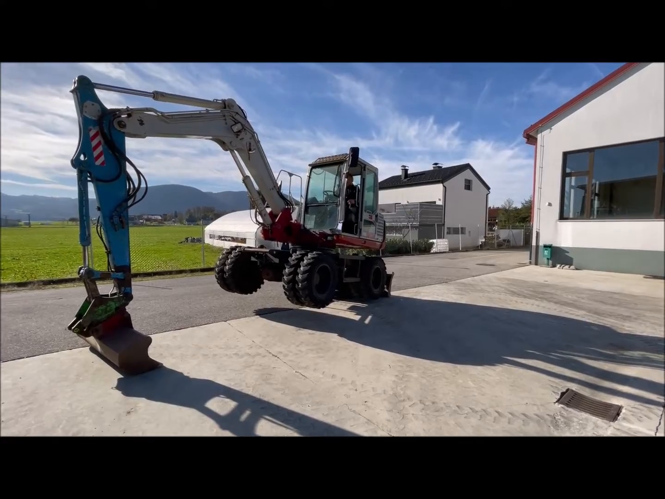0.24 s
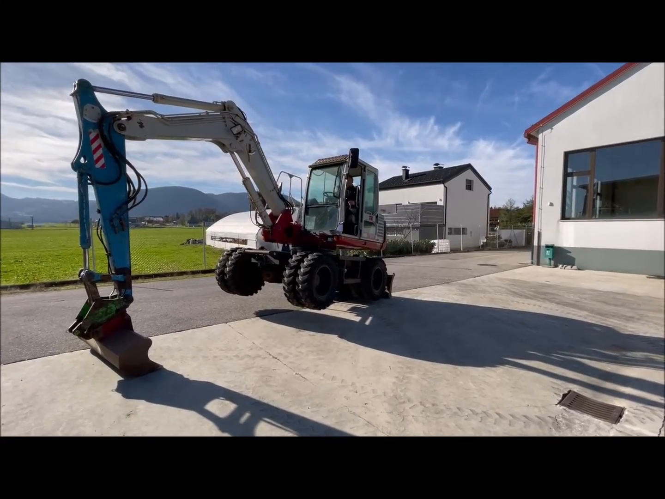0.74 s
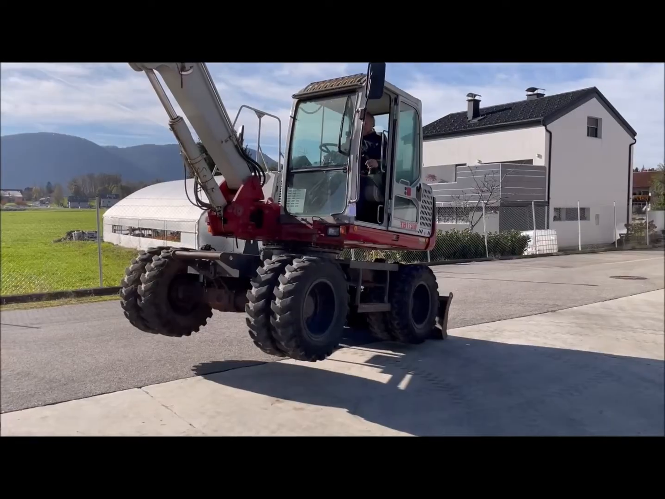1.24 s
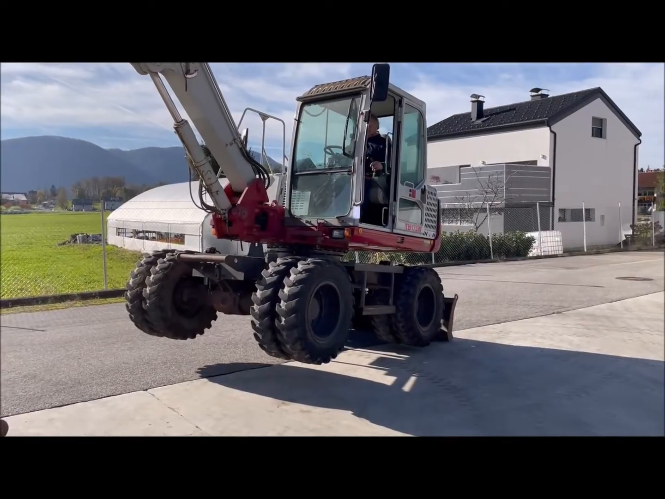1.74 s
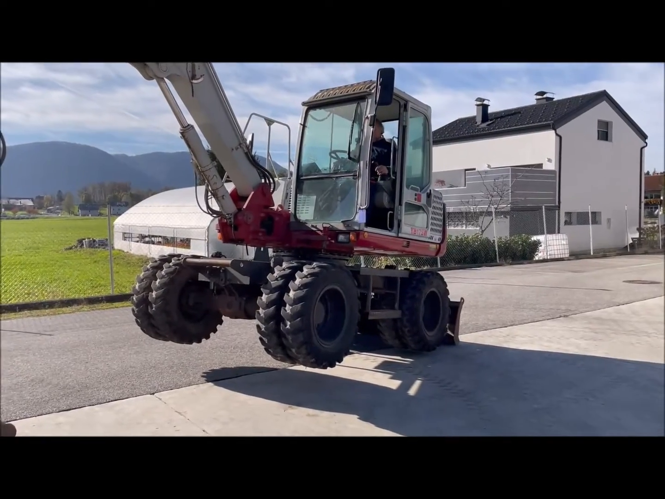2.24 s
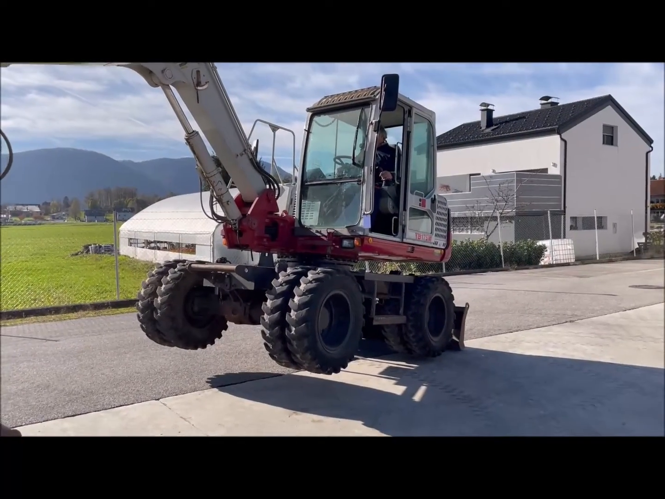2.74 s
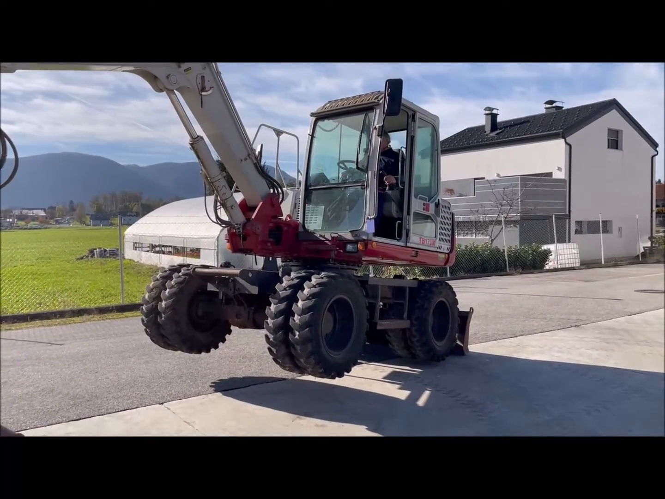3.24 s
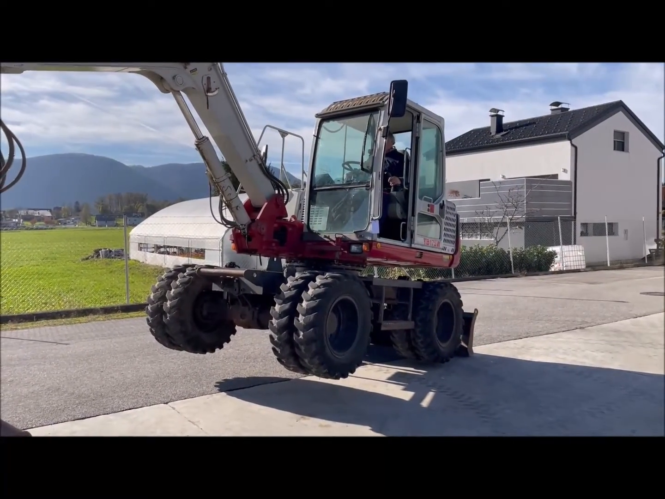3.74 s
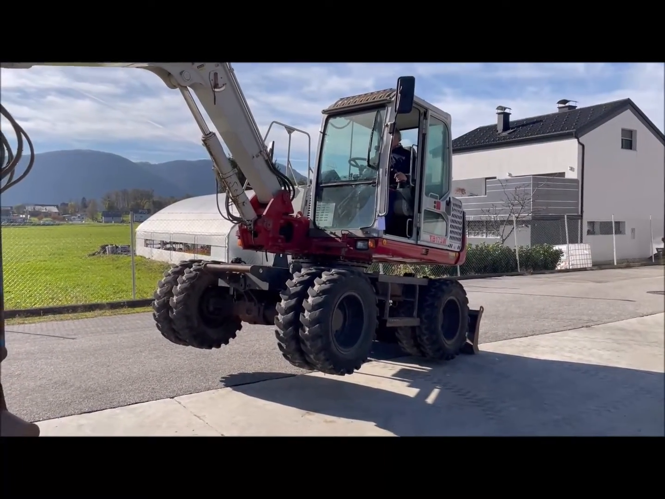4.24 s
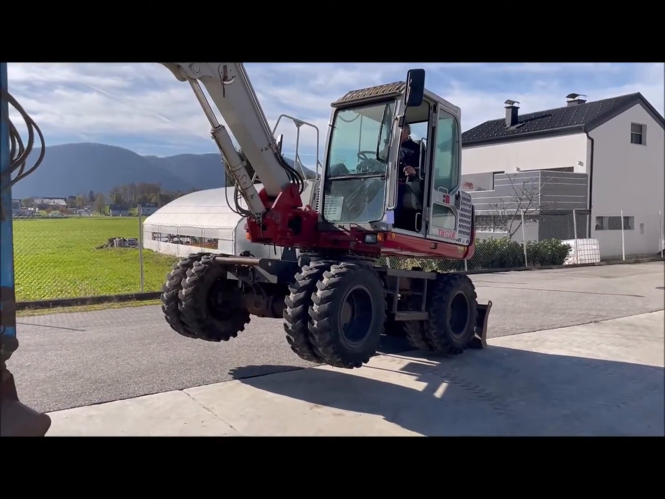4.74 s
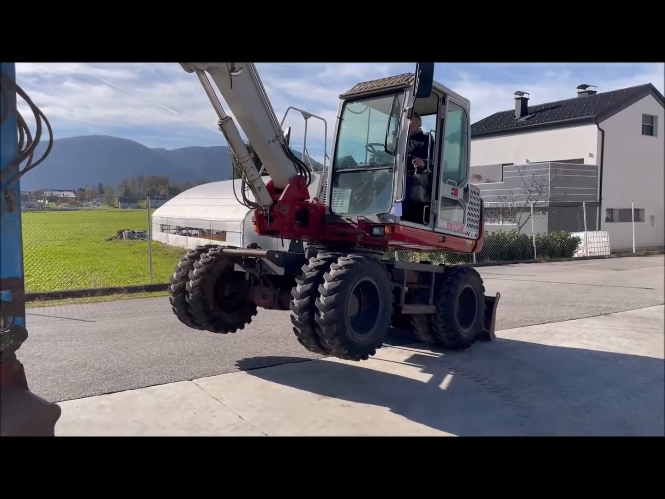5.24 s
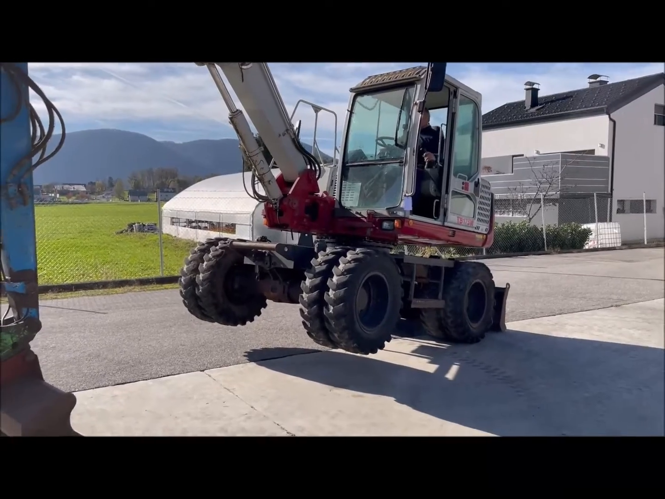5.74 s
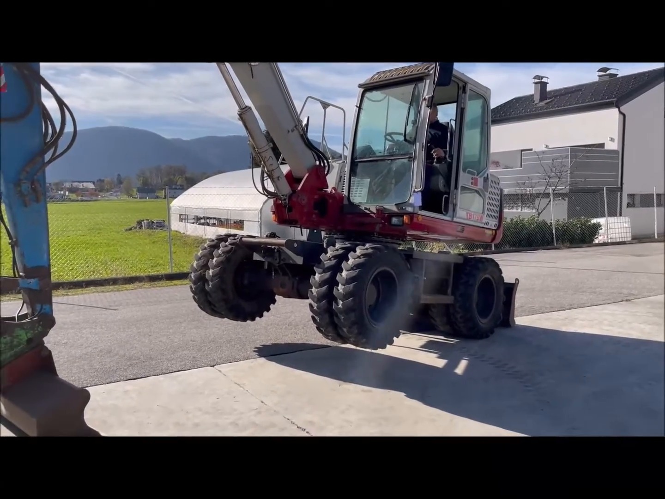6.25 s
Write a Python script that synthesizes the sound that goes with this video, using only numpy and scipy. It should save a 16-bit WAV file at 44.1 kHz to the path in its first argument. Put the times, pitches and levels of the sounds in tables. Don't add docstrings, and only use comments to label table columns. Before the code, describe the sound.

A mid-distance stereo pickup, narrowing toward the machine after a second, catches a low pulsing diesel with knocking panels and faint pump whine. Low wind buffets come and go. Around two seconds the load releases with moans and light ticks. Steady drone returns until a loud, uneven steel bucket scrape with hollow thuds, gritty rasp, stone cracks and pin clinks dominates the last second.

```python
import sys
import numpy as np
from scipy import signal
from scipy.fft import rfft, irfft
from scipy.io import wavfile

SR = 44100
rng = np.random.default_rng(int(sys.argv[2]) if len(sys.argv) > 2 else 0)


def volts(x):
    e = np.asarray(x, float) / 20
    return 10 ** e


def put_to_file(sound):
    columns = np.atleast_2d(sound).T
    safe = np.clip(columns, -1, 1)
    whole_steps = np.round(safe * 32767)
    wavfile.write(sys.argv[1], SR, whole_steps.astype(np.int16))


N = 286650
TIME = np.arange(N) / SR
HZ = np.maximum(np.fft.rfftfreq(N, 1 / SR), 1)
BLOCK_DB = -31.5


def rms_one(x):
    return x / np.sqrt(np.mean(x ** 2) + 1e-20)


def noise():
    return rng.standard_normal(N)


def in_time(rows):
    t, *columns = np.transpose(rows)
    return [np.interp(TIME, t, column) for column in columns]


def at_hz(points):
    hz, value = np.transpose(points)
    return np.interp(np.log(HZ), np.log(hz), value)


def colour(x, spectrum):
    below = (spectrum[0][0] / 1.5, -90)
    above = (spectrum[-1][0] * 1.2, -90)
    return rms_one(irfft(rfft(x) * volts(at_hz([below] + list(spectrum) + [above])), N))


def drift(rate_hz):
    return rms_one(irfft(rfft(noise()) / (1 + (HZ / rate_hz) ** 2), N))


def ring(x, hz, width_hz):
    radius, angle = np.exp(-np.pi * width_hz / SR), 2 * np.pi * hz / SR
    return signal.lfilter([0, np.sin(angle)], [1, -2 * radius * np.cos(angle), radius ** 2], x + 1e-18)


# (t/s, rate/firings per s)
FIRING_RATE = [(0, 47.35), (.4, 47.3), (.9, 47.05), (1.28, 46.6), (1.6, 46.1), (2.15, 45.95), (2.32, 46.2),
               (2.5, 47), (2.8, 47.35), (3.3, 47.4), (3.9, 47.2), (4.3, 47.35), (5.08, 47.4), (5.22, 46.9),
               (5.35, 46), (5.6, 46), (5.9, 46.6), (6.5, 46.9)]


def crankshaft():
    return np.cumsum(in_time(FIRING_RATE)[0]) / SR + .5


# (multiple of the four-firing cycle, level/dB)
EXHAUST_ORDERS = [(1, -40), (2, -34), (3, -24), (4, -4), (5, -17), (6, -25), (8, 1.5), (9, -26), (10, -14),
                  (11, -22), (12, -9), (13, -25), (14, -20), (16, -12.5), (18, -24), (20, -25.5),
                  (24, -21.5), (28, -25.5), (32, -24.5), (36, -22.5), (38, -29), (40, -23.5)]


def exhaust(firings, level_db):
    out = 0
    for order, db in EXHAUST_ORDERS:
        waver = volts(db + .5 * drift(0.46))
        offset = 2 * np.pi * rng.random() * (order % 4 > 0)
        offset = offset + .5 + 2.6 * np.clip(order / 8 - 1, 0, 1)
        out = out + waver * np.cos(2 * np.pi * order * firings / 4 + offset + .07 * drift(3.0))
    return np.sqrt(2) * volts(level_db) * out


CYLINDER_DB = [-2, 0, -2.5, -1]
# (f/Hz, level/dB per Hz)
BLOCK_SPECTRUM = [(130, 1.5), (185, -7.5), (245, -10), (340, -12.5), (460, -15.5), (610, -8), (780, -13.5),
                  (1280, -14), (1850, -16), (2650, -20.5), (3300, -25), (6500, -34.5), (10000, -39),
                  (15800, -46.5)]
# (f/Hz, power share 0-1)
LOOP_SHARE = [(150, .1), (700, .25), (1200, .5), (2000, .7), (4000, .65), (8000, .4)]
# (f/Hz, share 0-1)
KNOCK_SHARE = [(200, .3), (600, .55), (1500, .4), (2500, .45), (5000, .15), (9000, .05)]
# (f/Hz, width/Hz, rattle level/dB, knock level/dB, hardest firing 0-3, its lead/dB)
PANELS = [(555, 60, -12, -27, 2, 0), (600, 90, -6, -24, 3, 0), (655, 50, -14, -29, 0, 1),
          (915, 45, 0, -13, 1, 6), (1110, 50, -12, -16, 3, 13), (1530, 50, 0, -14, 0, 2),
          (1670, 80, -5, -12, 2, 10), (2030, 80, -10, -17, 3, 9), (2195, 100, -3, -19, 1, 3),
          (2570, 50, -6, -24, 2, 8)]


def block(firings, level_db):
    cycle = round(4 * SR / 47)
    place = (firings + .001 * drift(6.0)) / 4 * cycle
    looped = rng.standard_normal(cycle)[place.astype(int) % cycle]
    recurs = at_hz(LOOP_SHARE)
    clatter = irfft(np.sqrt(recurs) * rfft(looped) + np.sqrt(1 - recurs) * rfft(noise()), N)

    since = (firings + 0.36) % 1
    swell = volts(np.array(CYLINDER_DB)[firings.astype(int) % 4])
    swell = rms_one(swell * (1 - np.exp(-since / .12)) ** 2 * np.exp(-since / .35))
    pulsed = at_hz(KNOCK_SHARE)
    driven = pulsed * rfft(clatter * swell) + (1 - pulsed) * rfft(clatter)

    response, knocks = 1, 0
    for k, (hz, width, rattle_db, knock_db, hardest, lead_db) in enumerate(PANELS):
        response = response + volts(rattle_db) / (1 + 2j * (HZ - hz) / width)
        count = (firings + .12 + .035 * k).astype(int)
        chance_db = 1.2 * rng.standard_normal(count[-1] + 1)[count]
        blow_db = knock_db + lead_db * (count % 4 == round(hardest)) + chance_db
        blows = np.diff(count, prepend=count[0]) * volts(blow_db)
        knocks = knocks + ring(ring(blows, hz, 140), hz, 1.2 * width)
    knock_level_db = -11 + 0.51 * (level_db - BLOCK_DB)
    rattle = colour(irfft(driven * response, N), BLOCK_SPECTRUM)
    return volts(level_db + .5 * drift(0.51)) * (rattle + volts(knock_level_db) * rms_one(knocks))


# (multiple of the four-firing cycle, level/dB)
GEAR_ORDERS = [(42, -52), (44, -51), (46, -43.5), (48, -50), (50, -42.5), (51, -49), (52, -42.5),
               (54, -46.5), (56, -43.5), (58, -52), (60, -54)]


def whines(firings, level_db):
    mesh_at, cover_turn = .87, 4.1
    sway = .1 * drift(5.0)
    gear = 0
    for order, db in GEAR_ORDERS:
        phase = np.pi / 2 * order * (firings - mesh_at) + cover_turn * (order > 51) + sway
        gear = gear + volts(db + .8 * drift(4.0)) * np.cos(phase)
    whistle = volts(-46.5 + 1.5 * drift(7.0)) * np.sin(2 * np.pi * 1528 * TIME + .45 * drift(6.0))
    return np.sqrt(2) * volts(level_db - BLOCK_DB) * (gear + whistle)


# (multiple of the firing rate, level/dB)
PUMP_ORDERS = [(12, -40), (20, -48), (24, -49), (48, -39), (67, -61)]
# (f/Hz, level/dB per Hz)
VALVE_HISS = [(2000, -32), (3500, -29), (5800, -13), (6700, 4), (7400, 6), (9000, -43)]
# (start t/s, hold/s, level/dB)
MOANS = [
    (1.682, 0.28, -33.5),
    (2.059, 0.032, -32.5),
    (2.195, 0.01, -34.5),
]
# (t/s, level/dB, half length/s)
AIR_BLEEDS = [
    (1.81, -55.5, .02),
    (1.932, -51, 0.03),
    (2.05, -52.5, 0.03),
    (2.19, -55, .025),
    (5.31, -51, 0.035),
]
# (f/Hz, level/dB per Hz)
BLEED_HISS = [(9500, -32), (10800, -7), (12000, -6), (14200, 1), (15800, -6)]


def hydraulics(firings, pressure_db):
    whine = 0
    for order, db in PUMP_ORDERS:
        phase = 2 * np.pi * round(order) * firings + .25 * drift(8.0)
        whine = whine + volts(db + 1.5 * drift(10.0)) * np.sin(phase)
    swell, attack, release = 0, 0.031, 0.038
    for t, hold, db in MOANS:
        corners = np.cumsum([t, attack, hold, release]) - attack
        swell = swell + volts(db) * np.interp(TIME, corners, [0, 1, 1, 0])
    moan = swell * np.sin(2 * np.pi * 6 * firings)
    tones = np.sqrt(2) * (volts(np.minimum(pressure_db, 0)) * whine + moan)
    hiss = volts(-54.0 + .5 * pressure_db + 4.2 * drift(9.1)) * colour(noise(), VALVE_HISS)
    bleed = sum(volts(db) * np.exp(-((TIME - t) / half) ** 4) for t, db, half in AIR_BLEEDS)
    return tones + hiss + bleed * colour(noise(), BLEED_HISS)


# (crest t/s, level/dB)
GUSTS = [(0.005, -27.5), (.39, -28), (.49, -29), (.74, -33), (1.165, -25), (1.26, -24.5), (2.13, -60),
         (2.36, -48), (2.9, -27.5), (3.055, -28.5), (3.15, -34), (3.3, -30), (3.41, -27), (3.54, -38),
         (3.74, -44), (4.22, -27.5), (4.38, -25), (4.63, -35), (4.8, -25.5), (4.88, -28.5), (5.2, -36),
         (5.34, -28.5), (5.8, -42), (5.98, -50)]
# (f/Hz, level/dB per Hz)
WIND_RUMBLE = [(15, -54), (25, 1), (60, 14), (91, 14.5), (244, -16), (284, -12.5), (361, -18.5),
               (708, -9.5), (900, -25.5), (1170, -58), (1980, -120)]


def wind():
    gust_db = np.full(N, -55.0)
    for t, db in GUSTS:
        fall_db = np.maximum(217 * (t - TIME), 115 * (TIME - t))
        gust_db = np.maximum(gust_db, db - fall_db)
    shared = 0.42 * noise()
    return np.array([volts(gust_db + 6.0 + 1.7 * drift(33.0)) * colour(shared + noise(), WIND_RUMBLE)
                     for _ in range(2)])


def struck(blows, modes, snap, nearest_db):
    t, peak_db, nearest = np.transpose(blows)
    chance = rng.standard_normal((len(t), len(modes)))
    tick = sum(volts(db - 21) * (TIME > at) * np.exp(-np.abs(TIME - at) / 0.005) for at, db in zip(t, peak_db))
    out = tick * colour(noise(), snap)
    for k, (hz, db, t60) in enumerate(modes):
        clicks = np.zeros(N)
        strength_db = peak_db + db - 24 + nearest_db * (nearest.round() == k) + 1.1 * chance[:, k]
        clicks[(t * SR).astype(int)] = volts(strength_db)
        out = out + ring(clicks, hz, np.log(1000) / np.pi / t60)
    return out


# (t/s, peak level/dB, mode nearest the blow 0-5)
CLAMP_TICKS = [
    (2.1357, -25, 1),
    (2.2615, -24, 3),
    (2.2944, -21, 2),
    (2.3143, -19, 5),
    (2.356, -29, 2),
    (2.372, -27, 5),
    (2.3862, -23, 2),
    (2.4725, -29, 0),
    (2.4964, -21, 3),
]
# (f/Hz, level/dB, t60/s)
CLAMP_MODES = [(3150, -2, .02), (3700, -2, .018), (3950, -4, .035), (4830, -2, .022), (6000, -3, .015),
               (6700, -7, .03)]
# (f/Hz, level/dB per Hz)
CLAMP_SNAP = [(2800, -12), (3500, 13), (6300, -3), (7200, -7)]


def hose_clamps():
    return volts(8.0) * struck(CLAMP_TICKS, CLAMP_MODES, CLAMP_SNAP, nearest_db=8.0)


def chatter(low_hz, high_hz, per_s, cycles):
    height = volts(3.2 * np.minimum(rng.exponential(1, N), 4)) * rng.choice([-1, 1], N)
    hits = (rng.random(N) < per_s / SR) * height
    dealt = rng.integers(0, 14, N)
    patches = np.geomspace(low_hz, high_hz, 14)
    grains = sum(ring(hits * (dealt == k), hz, hz / cycles) * hz ** .5 for k, hz in enumerate(patches))
    return rms_one(grains) + 0.44 * noise() * np.sqrt(SR / 2 / (high_hz - low_hz))


# (f/Hz, width/Hz, level/dB)
SHELL_MODES = [(320, 74, 0.5), (490, 100, -3.5), (630, 75, 0.5), (800, 115, -1.5), (1050, 100, 0),
               (1300, 120, -6.5)]


def judder():
    steps = (np.cumsum(110 * volts(4 * drift(29.93))) / SR).astype(int)
    kicks = np.diff(steps, prepend=0)
    chance = rng.standard_normal((len(SHELL_MODES), N // 50))
    out = 0
    for k, (hz, width, db) in enumerate(SHELL_MODES):
        out = out + ring(kicks * volts(db + 2.5 * chance[k, steps]) * (-1) ** k, hz, width)
    return rms_one(out)


# (t/s, weight on the shell level/dB, bite of the edge level/dB, thud f/Hz)
SLIPS = [(2.296, -28, -29, 865), (2.3125, -20.5, -30, 693), (2.3235, -26, -31, 585), (2.345, -32, -33, 756),
         (5.351, -39, -21.5, 850), (5.371, -13, -22.5, 800), (5.386, -18.5, -38, 825),
         (5.437, -16, -14, 490), (5.4456, -20, -22, 1118), (5.4656, -22, -18.5, 706),
         (5.514, -19, -16, 453), (5.5356, -19, -21, 1334), (5.562, -11.5, -11.5, 1050),
         (5.5994, -34, -35, 594), (5.6246, -13.5, -16.5, 540), (5.65, -12.5, -33, 630),
         (5.678, -13, -13.5, 624), (5.7194, -37, -21, 656), (5.744, -15, -22, 1124),
         (5.7602, -13, -9.5, 735), (5.7786, -12.5, -14.5, 664), (5.799, -14, -17, 470),
         (5.821, -21, -19, 1064), (5.881, -17, -32, 1240), (5.893, -21, -26, 1510),
         (5.913, -17.5, -20, 1150), (5.936, -15.5, -31, 1145), (5.9613, -11, -23, 778),
         (5.984, -20, -39, 1163), (6.02, -19.5, -40, 611), (6.046, -21.5, -31, 604),
         (6.072, -18.5, -30, 993), (6.098, -20.5, -34, 1066), (6.1242, -18, -29, 1014),
         (6.2107, -27, -44, 700), (6.219, -26.5, -25, 1050), (6.242, -33, -38, 560), (6.263, -24, -37, 598),
         (6.2778, -26.5, -35.5, 906), (6.358, -28.5, -38, 1033), (6.37, -31, -26.5, 1024)]
# (t/s, level/dB)
DRAG = [
    (5.33, -49),
    (5.428, -19.5),
    (5.61, -14),
    (5.756, -16),
    (5.832, -17.5),
    (6.01, -19.5),
    (6.138, -23),
    (6.322, -32),
    (6.45, -29),
]
# (f/Hz, level/dB per Hz)
BOOM = [(29, -37), (50, -7.5), (92, 1), (124, -7), (204, -6.5), (280, -15.5), (330, -37), (430, -33),
        (730, -120)]
# (f/Hz, level/dB per Hz)
SHELL = [(160, -7), (280, -5), (332, -0.5), (394, -8.5), (526, -3.5), (629, -0.5), (702, -3), (943, -4.5),
         (1040, -4), (1800, -7.5), (2340, -3.5), (3960, -120)]
# (f/Hz, level/dB per Hz)
RASP = [(940, -46), (1600, 9.5), (1890, 1.5), (2410, 6.5), (2940, 4.5), (3170, 5), (3420, 3), (4440, 1),
        (4800, -5.5), (6240, -41), (10600, -120)]
# (f/Hz, level/dB per Hz)
GRIT = [(4300, 6), (4800, 3), (6500, -1), (7300, -2), (7900, -26), (8900, -13), (9600, -8.5), (12000, -17),
        (14000, -18), (15900, -30)]


def bucket():
    touching = np.clip((TIME - DRAG[0][0]) / 0.024, 0, 1) * np.clip((DRAG[-1][0] - TIME) / 0.053, 0, 1)
    force_db, = in_time(DRAG)
    late_db = np.interp(TIME - 0.041, TIME, force_db)
    boom = touching * volts(late_db - 1.5)
    shell = touching * volts(force_db - 5)
    rasp = touching * volts(-36.5 + 2 * (force_db + 18.5))
    grit = volts(-11.5) * rasp
    thuds, rub = np.zeros(N), noise()
    after = TIME[:SR // 8]

    def burst(rise, length):
        return (1 - np.exp(-after / rise)) * np.exp(-(after / length) ** 2)

    for t, shell_db, bite_db, thud_hz in SLIPS:
        boom_db = -27 + 1.3 * (shell_db + 16.5)
        grit_db = -38.5 + 1.31 * (bite_db + 8.5)
        now = slice(int(t * SR), int(t * SR) + len(after))
        rasp[now] = np.hypot(rasp[now], volts(bite_db - 5) * burst(0.0034, 0.021))
        boom[now] = np.hypot(boom[now], volts(boom_db + 5.5) * burst(0.0015, 0.012))
        shell[now] = np.hypot(shell[now], volts(shell_db - 5.5) * burst(0.0024, 0.034))
        grit[now] = np.hypot(grit[now], volts(grit_db + 15.5) * burst(0.00047, 0.02))
        tone = volts(-1) * burst(0.00039, .017) * np.sin(2 * np.pi * thud_hz * after)
        rubbed = ring(volts(-13.5) * burst(0.00033, 0.02) * rub[now], thud_hz, width_hz=430)
        thuds[now] += volts(shell_db) * (tone + rubbed)

    shell_chatter = colour(chatter(326.4, 1608, per_s=450, cycles=13.4), SHELL)
    out = thuds + boom * colour(noise(), BOOM)
    out = out + grit * colour(chatter(4850, 14600, per_s=5900, cycles=39.0), GRIT)
    out = out + shell * (volts(-1.0) * shell_chatter + volts(-3) * judder())
    return out + rasp * colour(chatter(1862, 4524, per_s=1200, cycles=42.0), RASP)


# (t/s, peak level/dB, f/Hz)
THUMPS = [(5.378, -15, 140), (5.422, -11, 320), (5.505, -19, 129), (5.564, -2, 163), (5.595, -4, 203),
          (5.624, -15, 188), (5.645, 4, 179), (5.655, -1, 197), (5.669, -14, 130), (5.688, -6, 189),
          (5.73, -2.5, 161), (5.763, -14, 210), (5.797, -4, 328), (5.82, -18, 136), (5.839, -17, 140),
          (5.863, -8, 155), (5.901, -1, 117), (5.928, -6, 205), (5.966, -1, 156), (5.988, -16, 121),
          (6.05, -14, 121), (6.08, -16, 168), (6.098, -11, 164), (6.142, -24, 129)]


def thumps():
    out = np.zeros(N)
    for t, db, hz in THUMPS:
        turns = hz * (TIME - t)
        hump = np.sin(np.pi * np.clip(turns / 1.05 / 2, 0, 1)) ** 2
        out = out + volts(db - 3) * np.sin(2 * np.pi * turns) * hump
    return out


# (t/s, peak level/dB)
CRACKS = [(5.4382, -34), (5.5628, -26), (5.68, -23.5), (5.7155, -32), (5.7678, -33), (5.9175, -53),
          (5.9559, -52), (6.0736, -42), (6.2193, -48), (6.2373, -42), (6.2812, -40.5), (6.3705, -53)]
# (f/Hz, level/dB per Hz)
CRACK_SPECTRUM = [(3000, -14), (6000, 3.5), (8500, 7.5), (11000, -3), (14000, -5), (15800, -8)]


def cracks():
    snap = sum(volts(db + 2.5) * (TIME > t) * np.exp(-np.abs(TIME - t) / 0.0059) for t, db in CRACKS)
    return snap * colour(noise(), CRACK_SPECTRUM)


# (t/s, peak level/dB, mode nearest the blow 0-6, 7 none)
PIN_CLINKS = [
    (5.5344, -10, 0),
    (5.9135, -7, 0),
    (6.0714, -9, 0),
    (6.212, -14, 0),
    (6.3594, -22, 0),
    (6.3693, -12, 5),
]
# (f/Hz, level/dB, t60/s)
PIN_MODES = [(2450, -2, .02), (3270, -3, .03), (3700, -3, .025), (4690, -2, .035), (5750, 0, .03),
             (6280, -15, .08), (10560, -20, .04)]
# (f/Hz, level/dB per Hz)
PIN_SNAP = [(2800, -25), (3500, 32), (6300, -18), (7000, -5)]


def loose_pins():
    return struck(PIN_CLINKS, PIN_MODES, PIN_SNAP, nearest_db=21)


# (f/Hz, phase/rad)
LEAD = [(300, 0), (700, .3), (2100, -.4), (4800, -.4), (6200, .7), (7600, 2.7), (9000, 3.5), (10400, 5.5),
        (11700, 6.3), (13100, 8), (15800, 10.2)]
# (f/Hz, level/dB)
TILT = [(300, 0), (900, -1), (2100, -.5), (3500, 0), (4800, 3.5), (6200, 1), (9000, 0)]


def ports(x, likeness, scatter):
    alike = np.clip(at_hz(likeness), 0, 1)
    shared, unlike = np.sqrt((1 + alike) / 2), np.sqrt((1 - alike) / 2) * scatter
    half = volts(at_hz(TILT) / 2) * np.exp(-.5j * at_hz(LEAD))
    return irfft(rfft(x) * np.array([(shared + unlike) * half, (shared - unlike) / half]), N)


# (f/Hz, likeness 0-1)
WIDE = [(90, .99), (300, .9), (600, .75), (1000, .4), (2300, .65), (3500, .4), (6000, .3), (9000, .3),
        (11000, .85)]
# (f/Hz, likeness 0-1)
FOCUSED = [(90, .99), (300, .9), (600, .9), (1000, .48), (2300, .62), (5000, .6), (6500, .6), (8300, .86),
           (15000, .93)]
# (f/Hz, level/dB per Hz)
WIDE_AIR = [(2500, -30), (4000, -49), (7500, 9), (9500, 13), (11000, -16)]


def pickup(machine):
    air = volts(-54.5) * colour(noise(), WIDE_AIR)
    echoes = noise() * np.exp(-TIME / .045)
    scatter = rfft(echoes / np.sqrt(np.sum(echoes ** 2)))
    focus = np.clip((TIME - 1.14) / 0.16 + .5, 0, 1)
    return (1 - focus) * ports(machine + air, WIDE, scatter) + focus * ports(machine, FOCUSED, scatter)


# (t/s, exhaust level/dB, oil pressure level/dB)
ENGINE_LOAD = [(0, -27.5, -13), (.4, -27.5, -12.5), (1.2, -26.5, -19), (1.32, -25, -10), (1.58, -25, -3.5),
               (2.1, -23.5, -6.5), (2.3, -22.5, -16), (2.5, -24, -41), (2.8, -26, -29), (3.9, -26, -45),
               (4.4, -26.5, -23), (5.05, -26.5, -23), (5.35, -24.5, -1), (5.6, -22, 7), (5.9, -30, -30),
               (6.2, -35.5, -72), (6.5, -33, -29)]


def scene():
    exhaust_db, pressure_db = in_time(ENGINE_LOAD)
    block_db = BLOCK_DB + 0.45 * (exhaust_db + 23.5)
    firings = crankshaft()
    machine = exhaust(firings, exhaust_db) + block(firings, block_db) + whines(firings, block_db)
    machine = machine + hydraulics(firings, pressure_db) + hose_clamps()
    machine = machine + bucket() + thumps() + cracks() + loose_pins()
    return pickup(machine) + wind()


def top_cut(x):
    return signal.sosfilt(signal.butter(12, 15920, fs=SR, output="sos"), x)


def record(dry):
    top = .82
    rounded = dry / (1 + (dry / top) ** 8) ** (1 / 8)
    finished = signal.sosfilt(signal.butter(2, 25, "high", fs=SR, output="sos"), rounded)
    return top_cut(finished)


dry = scene()
out = record(dry)
put_to_file(out)
```